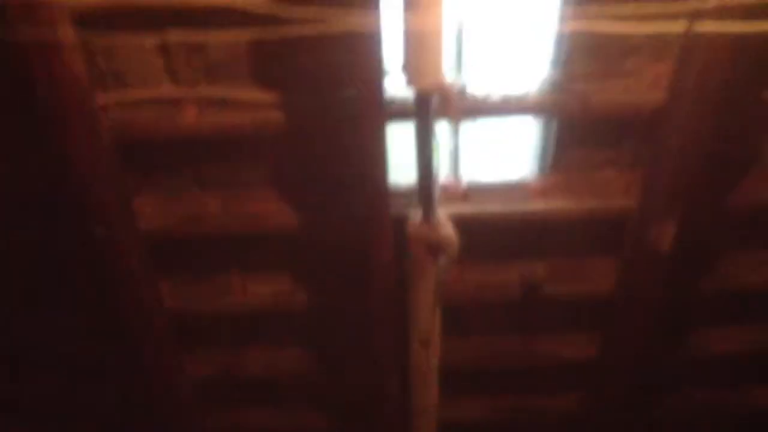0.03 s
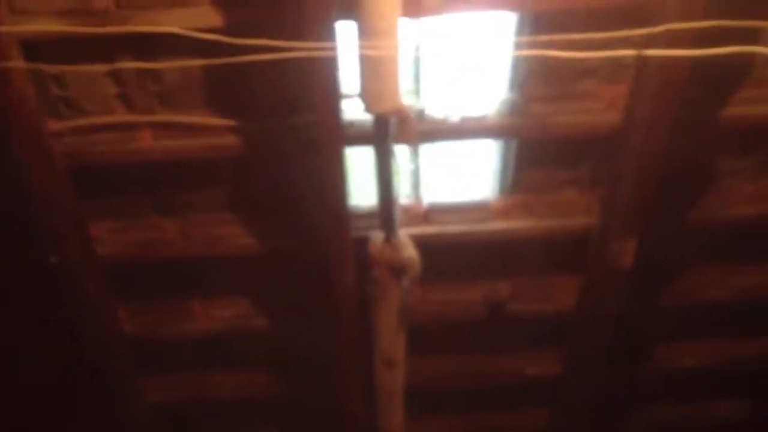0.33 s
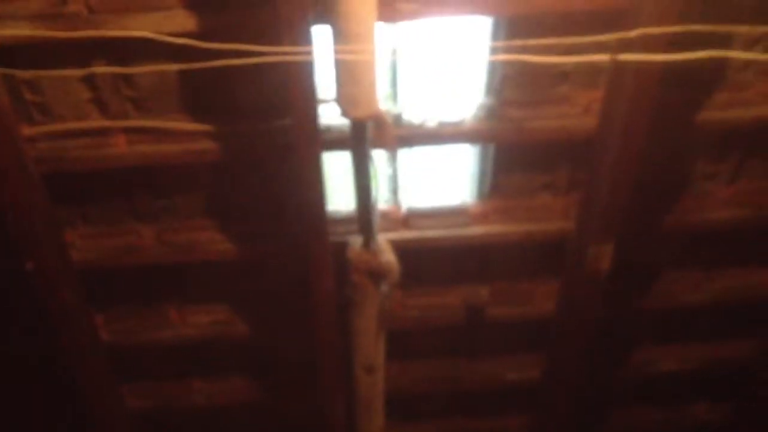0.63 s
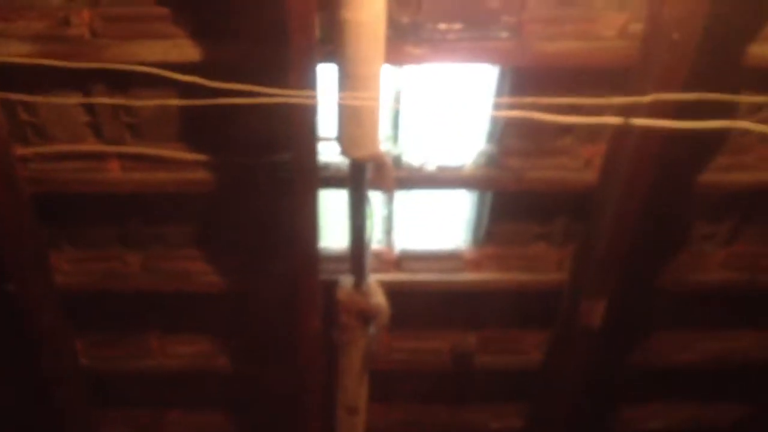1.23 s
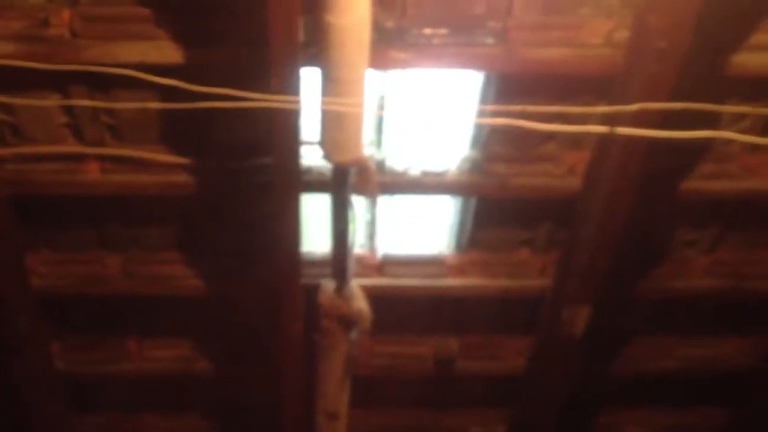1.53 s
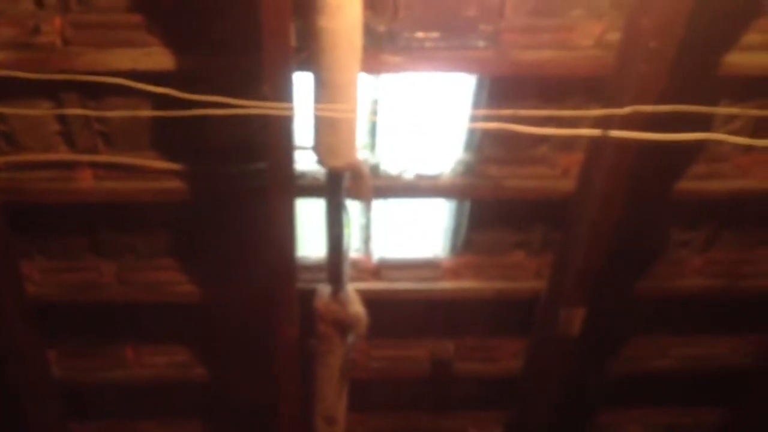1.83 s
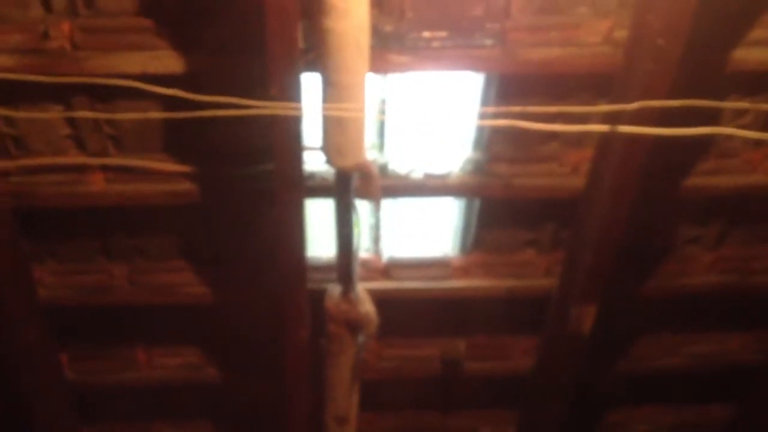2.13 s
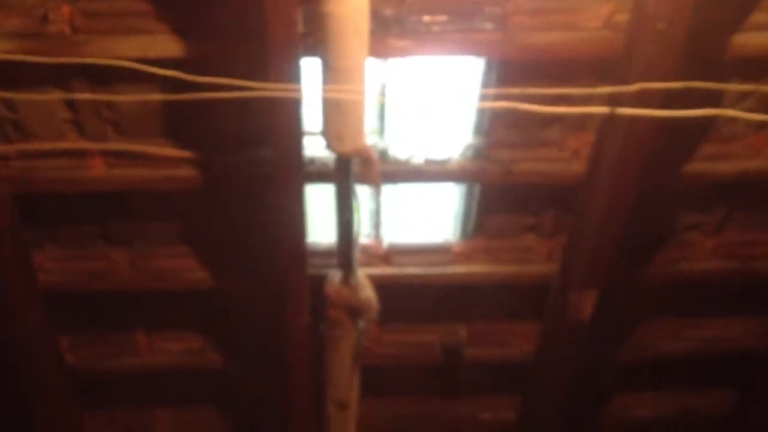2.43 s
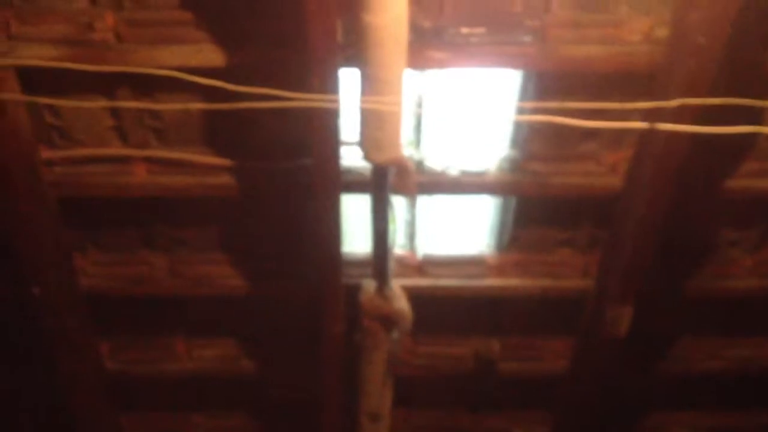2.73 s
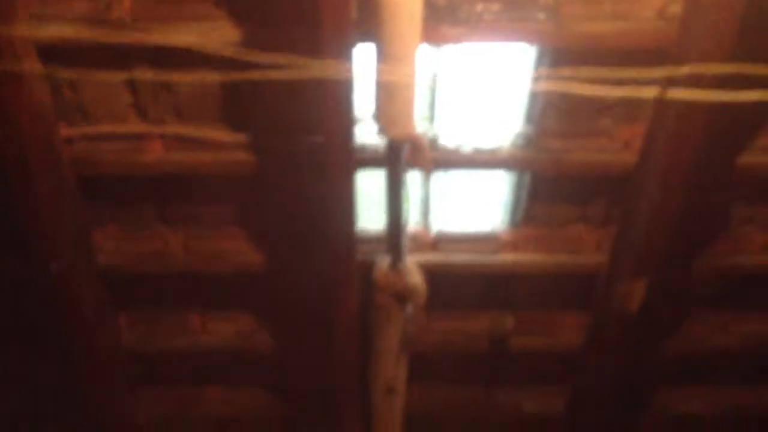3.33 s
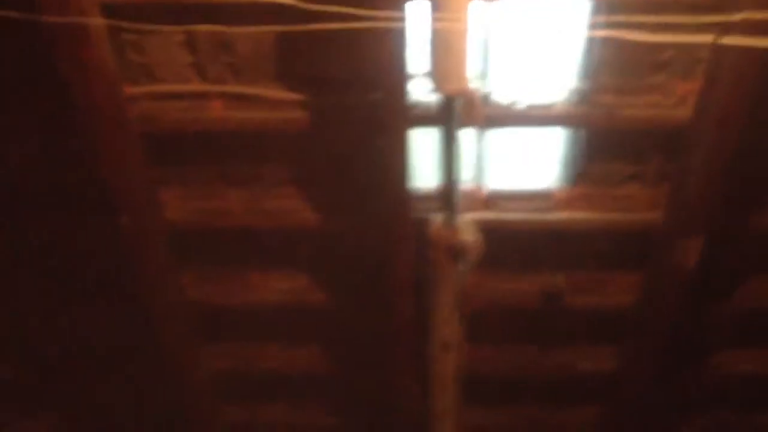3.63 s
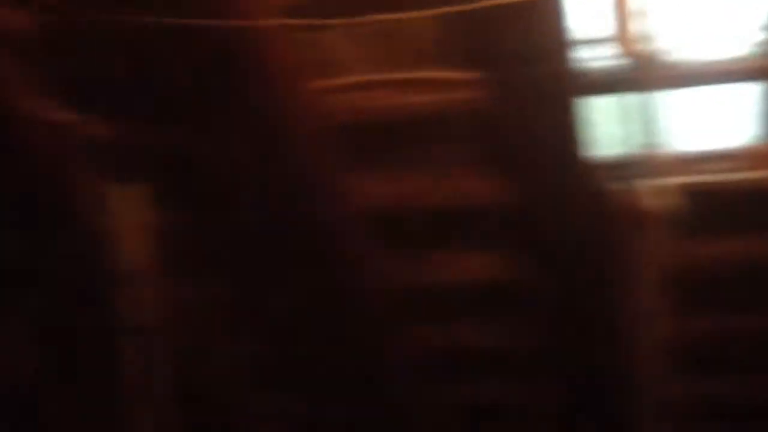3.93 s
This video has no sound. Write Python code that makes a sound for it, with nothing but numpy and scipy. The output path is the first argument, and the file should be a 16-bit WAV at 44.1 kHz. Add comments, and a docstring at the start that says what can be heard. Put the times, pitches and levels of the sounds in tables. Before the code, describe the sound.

Hailstones crack and clink on roof tiles overhead, with dense pattering between hits.

```python
"""Sharp cracks of hail on a clay-tile roof, heard from the loft just under it.
Each large stone is an impact that excites a tile's damped modes, while shards skitter and the rafters
reflect the sound. Hits right above give a hard ping; loose tiles clink. Small stones patter in between,
bouncing ice clicks, the battens thud now and then, and distant hits merge into a steady wash."""
import sys
import numpy as np
from scipy import signal
from scipy.fft import rfft, irfft
from scipy.io import wavfile
from scipy.ndimage import uniform_filter1d

SR = 44100
rng = np.random.default_rng(int(sys.argv[2]) if len(sys.argv) > 2 else 0)


def transcribe(u):
    """Save the signal u as a 16-bit wav file named by the first command-line argument.

    u: samples, shape (n,) or (channels, n), limited to [-1, 1]; the rate is SR.
    q: integer samples, one column per channel.
    """
    v = np.clip(np.atleast_2d(u).T, -1, 1)
    q = np.round(v * 32767).astype(np.int16)
    wavfile.write(sys.argv[1], SR, q)


N = 176400
SIZE = 16384  # samples in one impact
T, HZ = np.arange(SIZE) / SR, np.fft.rfftfreq(SIZE, 1 / SR)
# spectrum of a strike as the microphone picks it up, brightest near 6 kHz
# (frequency [Hz], relative spectral level [dB])
STRIKE_SPECTRUM = [(80, -60), (170, -28), (500, -13), (800, -16), (1200, -14.5), (3500, -12.5), (4500, -9),
                   (5400, -4.5), (6200, 3.5), (7000, -5.5), (8000, -12), (9400, -24), (11400, -21),
                   (15500, -33.5)]


def large_stones():
    """Impact excitation: each large stone landing overhead sets a different tile ringing."""
    # (time [s], level [dB], snap gain [dB], tile clack gain [dB], ice tick gain [dB], rise time [s])
    impacts = [(0.0007, -20, -10, 0, 4, 0.00011), (0.0781, -25.5, -2, 1.5, 1.0, 0.0004),
               (0.2211, -26.5, 7.5, 6, 3.5, 0.0043), (0.3687, -29, 8, 3.5, -4, 0.0034),
               (0.4274, -23.5, -4, 1, -7, 0.00039), (0.5035, -27, 3, 1, 3, 0.0029),
               (0.5349, -28.5, 3, -15, 7.5, 0.0004), (0.5678, -26.5, 5, 1, 1, 0.003),
               (0.6271, -40.5, 19, 0, -11, 0.0018), (0.6753, -27, -3, 5.5, 5.5, 0.00074),
               (0.765, -18, -10, 2.5, 1, 0.014), (0.763, -23.5, 0, -1.5, 8, 0.0022),
               (0.877, -22, -5, 3, 0, 0.0091), (0.9259, -23.5, 0, 3, -6, 0.002),
               (1.027, -24, -9, 0.5, 2.5, 0.0012), (1.1672, -22, -9, 0.5, -1, 0.0041),
               (1.2165, -18, -16, -1.5, -2, 0.0021), (1.3074, -23.5, 4, -0.5, 1, 0.0042),
               (1.3479, -26.5, 0, 2.5, 1, 0.0023), (1.375, -41.5, 19, 2, 4, 0.0019),
               (1.4642, -27.5, 12, 3.5, -1, 0.0075), (1.612, -27.5, -9, 2, -1, 0.0027),
               (1.661, -23.5, 14.5, -2, 0, 0.009), (1.7394, -27, 8, -5.5, 1, 0.00041),
               (1.812, -25.5, -9, 3, 1, 0.0056), (1.8591, -25, 3.5, 1, -10, 0.0055),
               (1.974, -23, -5, -0.5, 1.5, 0.01), (2.0535, -24.5, 0, 2.5, 3, 0.0026),
               (2.1567, -24, 1, -0.5, 1, 0.0046), (2.2148, -28.5, 13, -2, -2, 0.0076),
               (2.4089, -19.5, -14, -1.5, 0.0, 0.0005), (2.4825, -26, 7.5, -1.5, 1, 0.00096),
               (2.4966, -31, 15.5, 0.5, 0, 0.00037), (2.5603, -30, 5, 3, 5, 0.0012),
               (2.6272, -23.5, -1, 0, -9, 0.0014), (2.6491, -37.5, 19.5, 5.5, -6, 0.0032),
               (3.0472, -23.5, 1, -7, -22, 0.00087), (3.0679, -24, -5, -3, 4.5, 0.0085),
               (3.099, -20.5, -12, -1, -7, 0.0006), (3.1732, -17.5, 3.5, -3.5, -5, 0.0014),
               (3.1849, -25.5, -4, 2, -1, 0.0014), (3.2483, -22, 5.5, -4, -6, 0.00041),
               (3.315, -23.5, -5, 0, 1, 0.0033), (3.3825, -22, 1, 1.5, 2, 0.00071),
               (3.471, -20, -2, -5, -4, 0.0025), (3.5241, -25.5, 13.5, 1.5, 1.5, 0.012),
               (3.5507, -36, 23.5, 3.5, -8, 0.0096), (3.6416, -25.5, -4, 4.5, -3, 0.00035),
               (3.646, -22, 10.5, -9, 1, 0.0066), (3.7494, -25.5, -4, 0, 8, 0.0004),
               (3.7694, -20.5, -12, -0.5, -3, 0.0094), (3.81, -25, 4.5, 3.5, 1, 0.0069),
               (3.943, -35, 16, -8, 4, 0.00028), (3.957, -26, -6, 1, 0, 0.00055)]
    out = np.zeros(N)
    for time, db, snap_db, clack_db, tick_db, rise_s in impacts:
        add(out, time, amp(db) * strike(snap_db, clack_db, tick_db, rise_s))
    return out


def strike(snap_db, clack_db, tick_db, rise_s):
    """Two-slope decay: a fast direct snap adds in power to the slower skitter and loft echoes."""
    clack_edge_hz, tick_edge_hz = 3180, 8900
    clack_band = 1 / (1 + (HZ / clack_edge_hz) ** 10)
    tick_band = 1 - 1 / (1 + (HZ / tick_edge_hz) ** 20)
    bands = (clack_band, 1 - clack_band - tick_band, tick_band)
    skitter = irfft(sum(rfft(shards()) * np.sqrt(abs(band)) for band in bands))  # each has its own grain
    rise = 1 - np.exp(-T / (rise_s + 1 / SR))
    fall = np.hypot(amp(snap_db) * decay(t60=0.096), decay(t60=0.42))
    gain = tile_response() * amp(clack_db * clack_band + tick_db * tick_band)
    return coloured(skitter * rise * fall, gain)


def tile_response(overtones=15):
    """Modal resonance: peaks stand above the strike spectrum, varying with the tile and the spot hit."""
    # modes of a clay tile (frequency [Hz], width [Hz], height above the strike spectrum [dB])
    modes = [(994, 79, 10.5), (1230, 72, 13), (1656, 35, 10.5), (2266, 230, 10), (2951, 49, 12),
             (3947, 146, 7.5)]
    detune_spread, spot_spread_db = 0.016, 3
    overtone_range_hz, overtone_width_hz, overtone_db = (1380, 14590), 35, 11.5
    power = np.ones(len(HZ))
    for hz, width, db in modes:
        detune, spot = rng.standard_normal(2)
        offset = (HZ - hz * (1 + detune_spread * detune)) / width
        power += amp(db + spot_spread_db * np.tanh(spot)) ** 2 / (1 + offset ** 2) ** 2
    for hz in np.exp(rng.uniform(*np.log(overtone_range_hz), overtones)):
        offset = (HZ - hz) / overtone_width_hz
        power += amp(overtone_db) ** 2 / (1 + offset ** 2) ** 2
    return unit_rms(amp(spectrum_db(STRIKE_SPECTRUM, HZ)) * np.sqrt(power))


def shards(grain_s=0.0012, spread_db=1):
    """Random amplitude modulation: shards and early echoes break noise into uneven grains."""
    grain = np.interp(T, np.arange(SIZE) * grain_s, rng.standard_normal(SIZE))
    return unit_rms(rng.standard_normal(SIZE) * amp(spread_db * grain))


def pings():
    """Direct sound: the hard, dry ping of a stone hitting the tile right above."""
    # (time [s], level [dB])
    direct_hits = [(0.2249, -17), (.429, -15), (0.6303, -16.5), (0.766, -15.5), (1.7393, -27),
                   (2.4093, -12), (3.385, -17), (3.475, -18.5)]
    gain = unit_rms(amp(spectrum_db(STRIKE_SPECTRUM, HZ)))
    out = np.zeros(N)
    for time, db in direct_hits:
        burst = rng.choice([-1, 1], SIZE) * decay(t60=0.018)
        add(out, time, amp(db) * coloured(burst, gain))
    return out


def clinks(rise_s=0.00047):
    """Free vibration: a loose tile rings on one mode, a damped sinusoid."""
    # ringing tiles (time [s], frequency [Hz], level [dB])
    rings = [(.223, 1670, -30), (.628, 6490, -24), (0.767, 5270, -25), (0.929, 1550, -25),
             (1.219, 2480, -25), (1.667, 5390, -25), (1.741, 5830, -25), (2.065, 6570, -21),
             (2.161, 2400, -30), (2.41, 5920, -31), (2.421, 3240, -29.5), (2.497, 3610, -30.5),
             (2.657, 1015, -27.5), (3.044, 6020, -21), (3.044, 2410, -26), (3.174, 2990, -25),
             (3.173, 4070, -33), (3.185, 991, -30), (3.185, 2343, -24.5), (3.189, 5945, -23),
             (3.644, 1520, -29), (3.65, 5800, -25), (3.654, 1000, -31.5), (3.658, 1900, -29)]
    envelope = (1 - np.exp(-T / rise_s)) * decay(t60=0.2)
    out = np.zeros(N)
    for time, hz, db in rings:
        add(out, time, amp(db) * envelope * np.sin(2 * np.pi * hz * T))
    return out


def patter(stones_per_s=260, spread_db=1.5, tiles=20):
    """Shot noise: small stones fall at random on many tiles, each a short dry tick."""
    # strength of the small hail (time [s], level [dB])
    shower = [(0, -29), (.2, -36.5), (.3, -31), (.72, -31.5), (1, -31), (1.13, -37.5), (1.95, -46),
              (2.04, -28.5), (2.15, -27), (2.29, -37), (2.73, -28.5), (2.97, -28), (3.33, -30),
              (3.6, -41.5), (4, -41)]
    sizes = amp(spread_db * np.minimum(rng.exponential(1, N), 2.5))
    hits = sizes * (rng.random(N) < stones_per_s / SR)
    struck_tile = rng.integers(0, tiles, N)
    ticks = [strike(0, 0, 0, rise_s=0.0024) * decay(t60=0.27) for _ in range(tiles)]
    ticking = sum(signal.oaconvolve(hits * (struck_tile == k), tick)[:N] for k, tick in enumerate(ticks))
    strength = amp(np.interp(np.arange(N) / SR, *np.transpose(shower)))
    return strength * unit_rms(ticking)


def splinters(hail, clicks_per_s=200, band_hz=(7900, 13100), relative_db=-22.5):
    """Secondary impacts: bouncing ice makes tiny bright clicks whose level follows that of the hail."""
    hail_rms = np.sqrt(abs(uniform_filter1d(hail ** 2, size=2048)))
    hits = rng.exponential(1, N) * (rng.random(N) < clicks_per_s / SR)
    clicks = signal.oaconvolve(hits, decay(t60=0.03))[:N] * rng.standard_normal(N)
    bright = signal.lfilter(*signal.butter(2, band_hz, "bandpass", fs=SR), clicks)
    return amp(relative_db) * hail_rms * unit_rms(bright)


def battens(rise_s=0.0068):
    """Structure-borne sound: heavy blows shake the timber, which answers with a dull thud."""
    # heavy blows (time [s], relative level [dB])
    blows = [(0.673, -33), (1.253, -44.5), (2.502, -34), (3.154, -38)]
    # response of the battens (frequency [Hz], relative spectral level [dB])
    timber_spectrum = [(95, -66), (145, 0), (195, 10), (260, 5.5), (550, -19), (3000, -67)]
    timber = unit_rms(amp(spectrum_db(timber_spectrum, HZ)))
    out = np.zeros(N)
    for time, db in blows:
        push = rng.standard_normal(SIZE) * (1 - np.exp(-T / rise_s)) * decay(t60=0.087)
        add(out, time, 2 * amp(db) * coloured(push, timber))
    return out


def wash(level_db=-38.5, patch_db=1.6):
    """Incoherent summation: countless distant hits merge into a patchy hiss and a low drumming."""
    # hail on the far roof (frequency [Hz], relative spectral level [dB])
    roof_spectrum = [(60, -10), (98, -17), (118, 5), (180, 5), (330, 2), (750, 2.5), (1100, 5), (2300, 0),
                     (4600, -1.5), (6100, 3.5), (7500, -12), (9400, -19), (11500, -23), (15500, -35)]
    frames, hz = N // 256 + 5, np.fft.rfftfreq(1024, 1 / SR)
    real, imaginary, patches = rng.standard_normal((frames, len(hz), 3)).T
    patches = uniform_filter1d(patches, size=10, axis=0)  # smooth over frequency
    patches = unit_rms(uniform_filter1d(patches, size=8, axis=1))  # and over time
    gain = amp(spectrum_db(roof_spectrum, hz)[:, None] + patch_db * patches)
    _, noise = signal.istft((real + 1j * imaginary) * gain, nperseg=1024, noverlap=768)
    return amp(level_db) * unit_rms(noise[:N])


def coloured(x, gain):
    """Minimum-phase filtering: folding the cepstrum gives a causal filter with this gain curve."""
    cepstrum = irfft(np.log(gain + 1e-6))
    cepstrum[1:SIZE // 2] *= 2
    cepstrum[SIZE // 2 + 1:] = 0
    return irfft(rfft(x) * np.exp(rfft(cepstrum)))


def decay(t60):
    """Exponential damping: a fall of 60 dB in t60 seconds."""
    return np.exp(-np.log(1000) * T / t60)


def spectrum_db(points, hz):
    """Interpolation of spectral levels on a log-frequency axis."""
    frequencies, levels = np.transpose(points)
    return np.interp(np.log(hz + 1), np.log(frequencies), levels)


def amp(db):
    """Decibels to amplitude ratio."""
    return 10 ** (np.asarray(db) / 20)


def unit_rms(x):
    """Normalisation to unit mean power."""
    return x / np.sqrt(np.mean(x ** 2) + 1e-20)


def add(mix, start_s, sound):
    """Superposition of a sound on the mix from start_s on."""
    part = mix[max(round(start_s * SR), 0):][:len(sound)]
    part += sound[:len(part)]


def scene():
    """Linear superposition: all the roof's sources add at one point below it."""
    hail = large_stones() + patter()
    return (hail + pings() + clinks() + splinters(hail) + battens() + wash())[None]


def record(dry, low_cut_hz=125, band_limit_hz=15650):
    """Band limiting: a gentle cut below about 125 Hz, then a steep low-pass at the end of the treble."""
    low_cut = signal.butter(2, low_cut_hz, "highpass", fs=SR, output="sos")
    low_pass = signal.firwin(511, band_limit_hz, window=("kaiser", 9), fs=SR)
    return signal.oaconvolve(signal.sosfilt(low_cut, dry), low_pass[None], "same")


dry = scene()
out = record(dry)
transcribe(out)
```